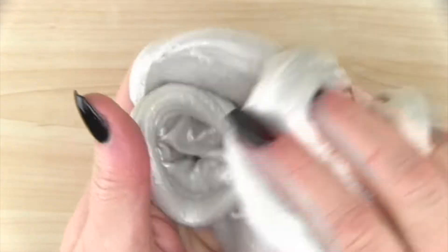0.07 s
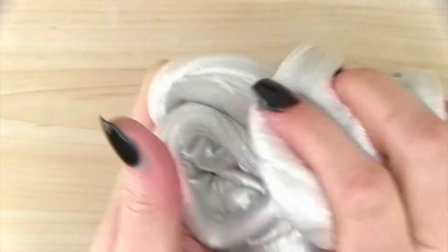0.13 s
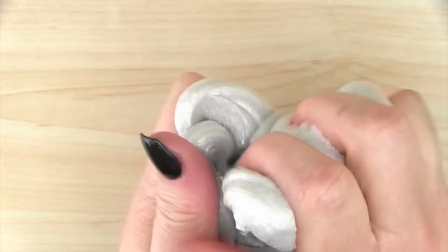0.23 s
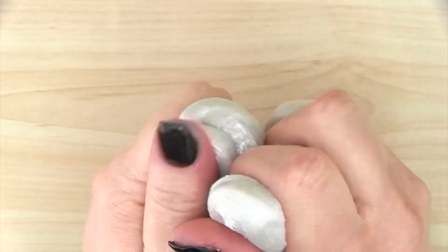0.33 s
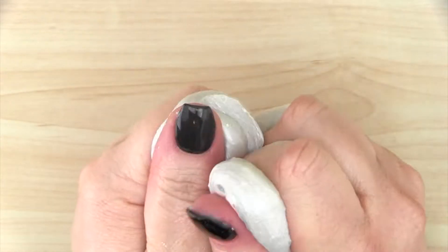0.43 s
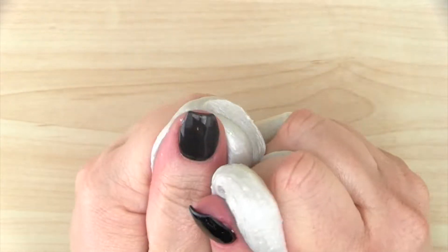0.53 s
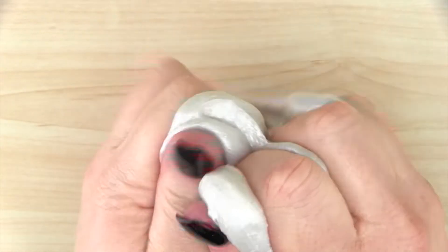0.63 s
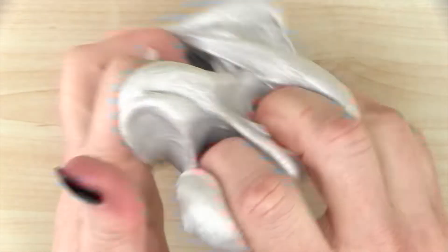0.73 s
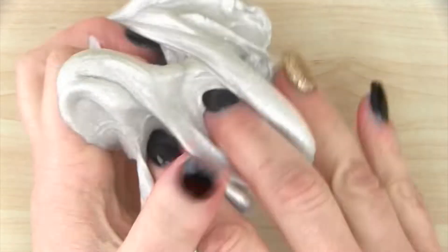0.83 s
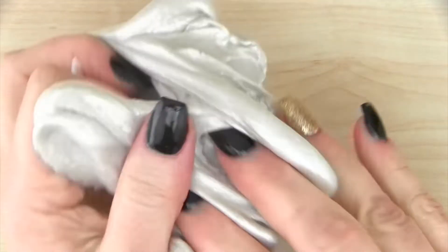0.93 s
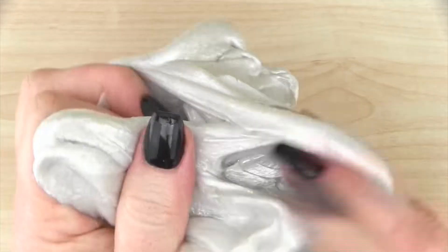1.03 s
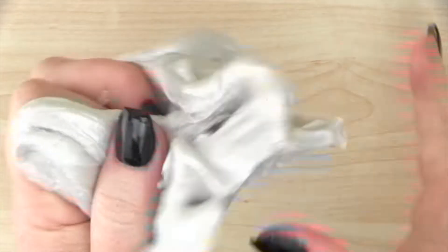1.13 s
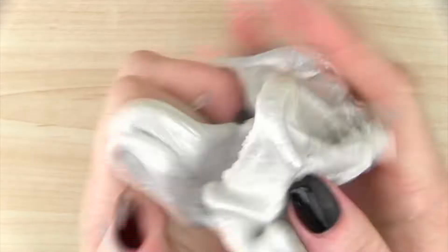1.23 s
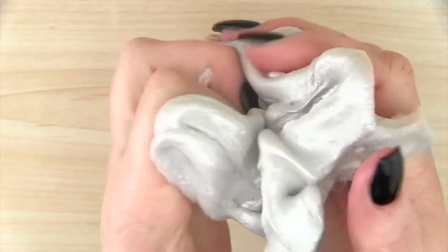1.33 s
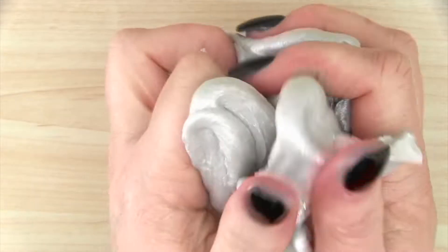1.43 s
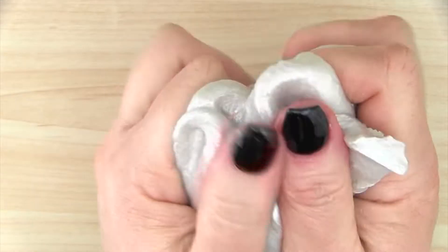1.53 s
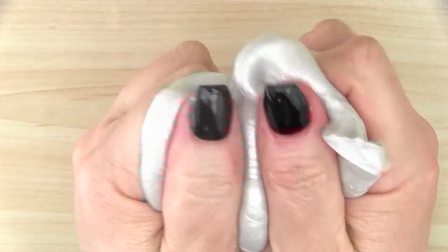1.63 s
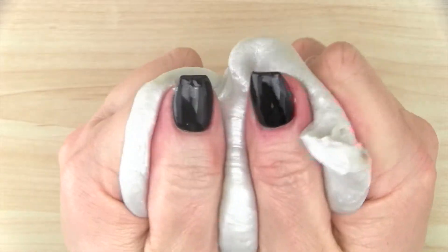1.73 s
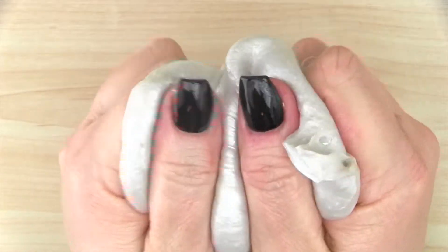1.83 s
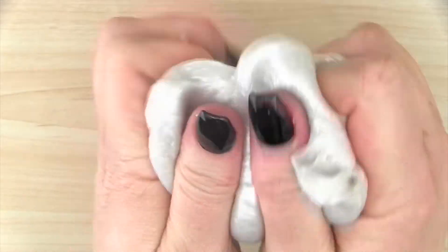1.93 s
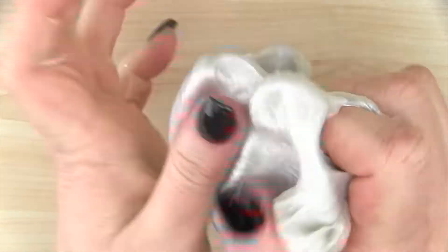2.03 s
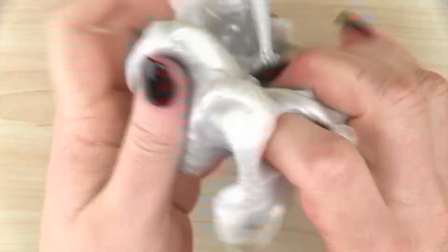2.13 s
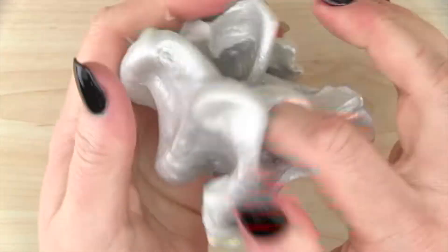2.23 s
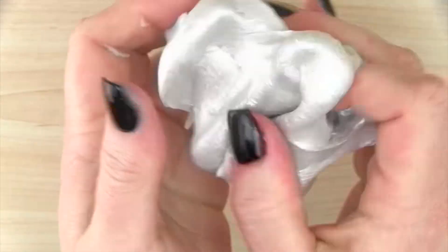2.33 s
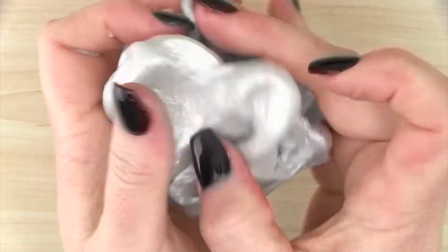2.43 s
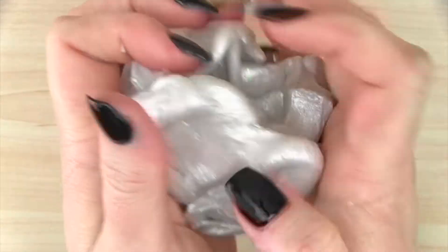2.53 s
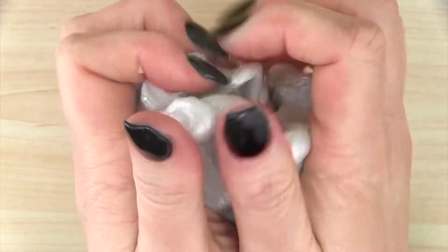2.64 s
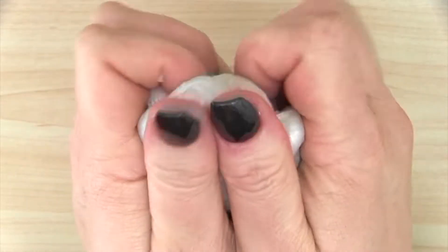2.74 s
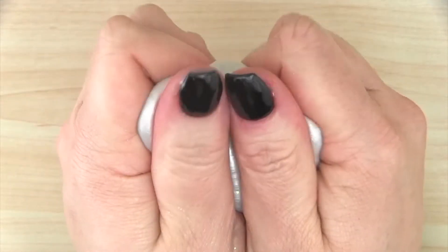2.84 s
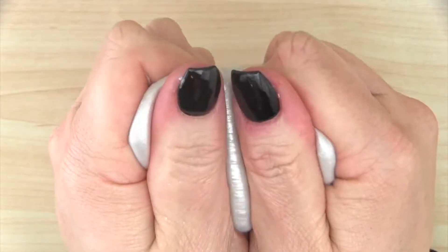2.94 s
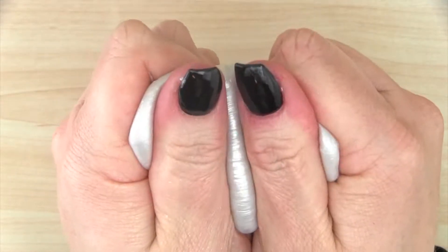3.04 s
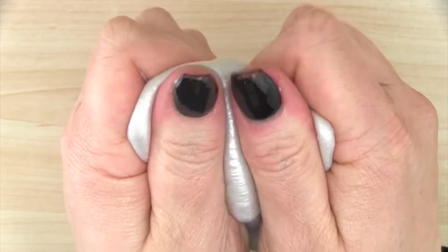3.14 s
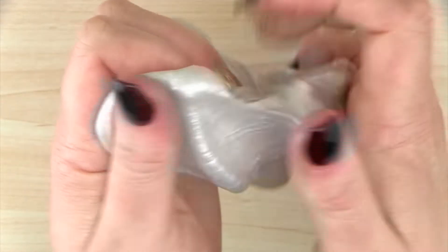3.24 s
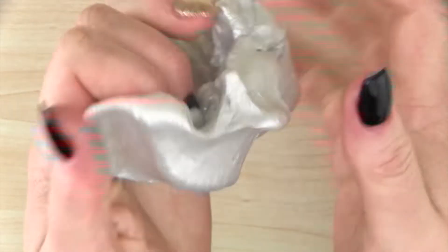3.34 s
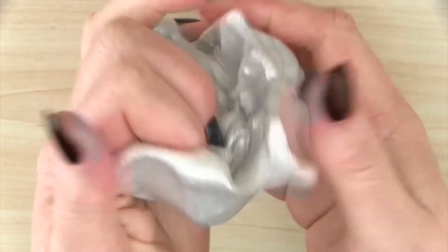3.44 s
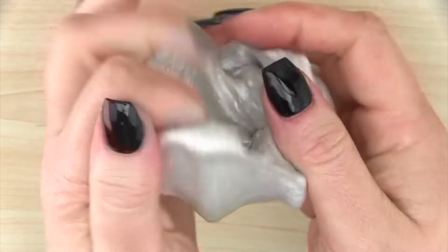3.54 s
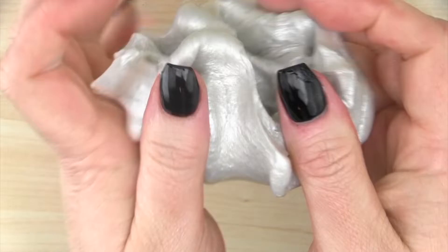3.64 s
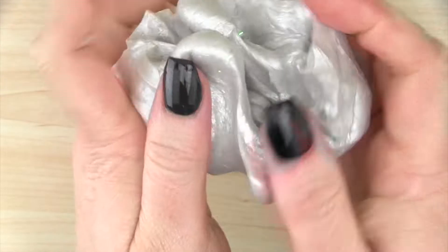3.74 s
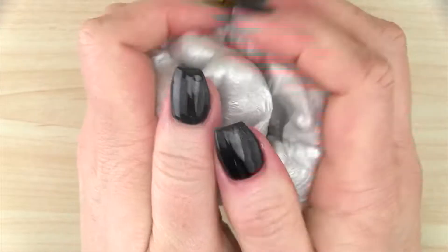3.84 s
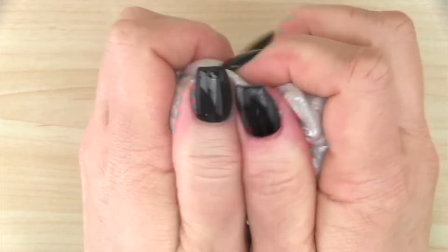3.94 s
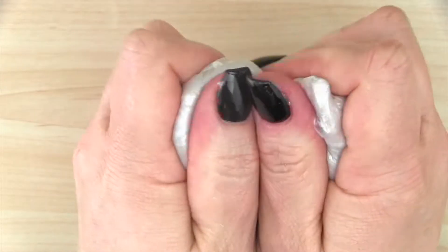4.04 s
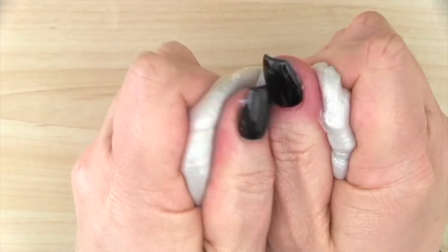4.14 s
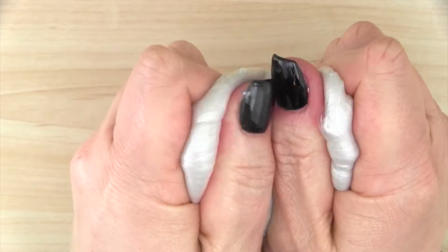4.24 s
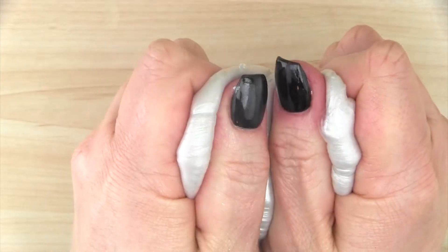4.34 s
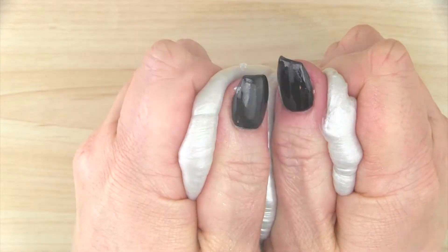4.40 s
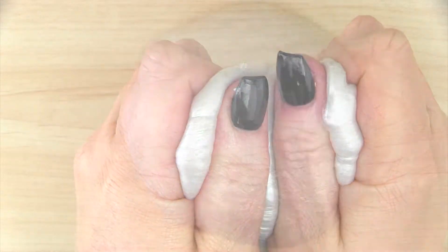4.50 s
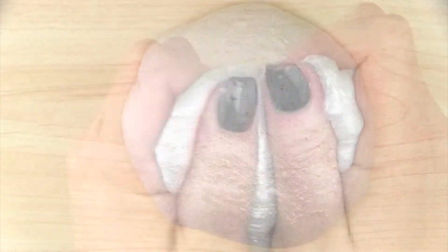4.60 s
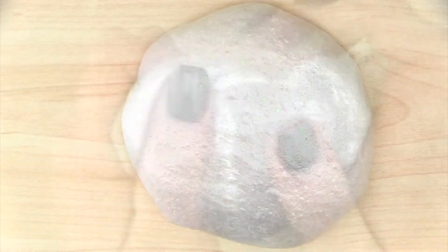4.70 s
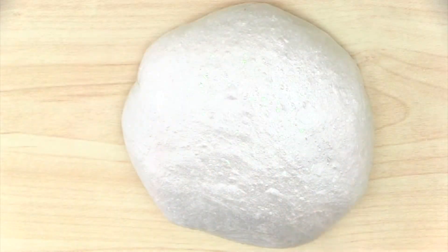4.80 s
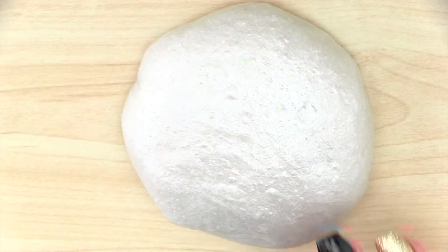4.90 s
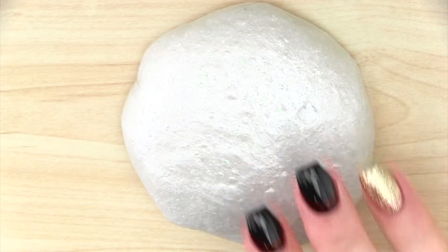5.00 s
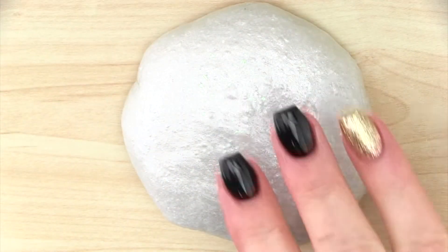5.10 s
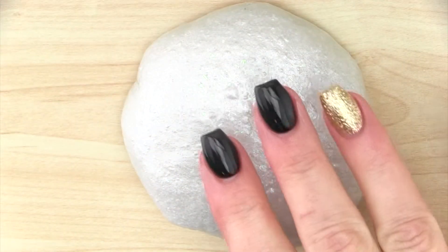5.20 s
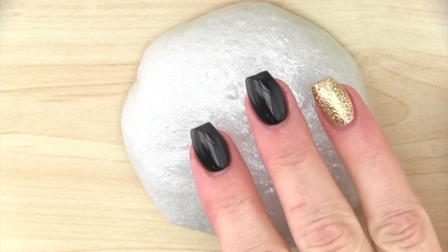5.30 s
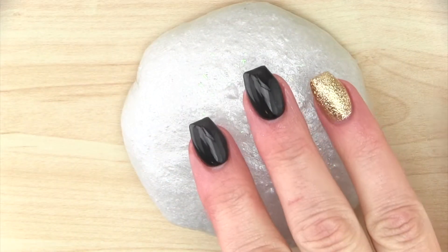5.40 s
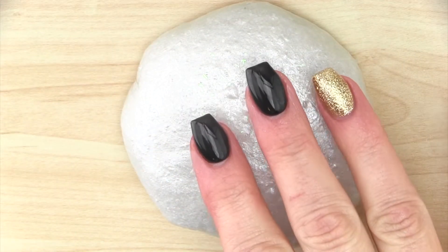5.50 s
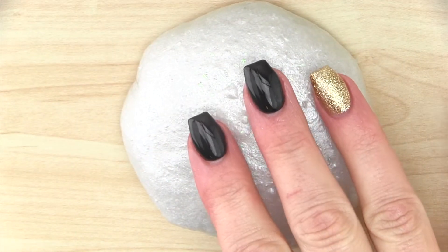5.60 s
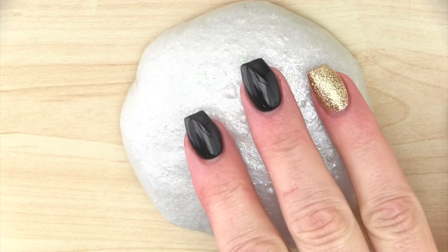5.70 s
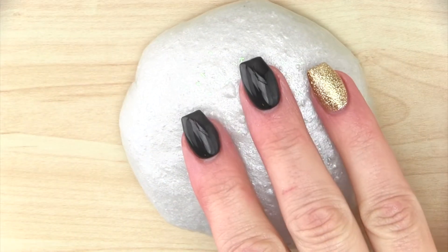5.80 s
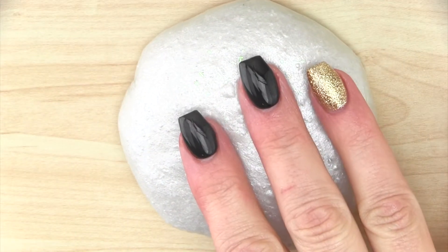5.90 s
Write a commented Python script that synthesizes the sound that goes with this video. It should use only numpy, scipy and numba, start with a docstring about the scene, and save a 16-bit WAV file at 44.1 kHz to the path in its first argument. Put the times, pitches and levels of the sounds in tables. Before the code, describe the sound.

Sticky slime is kneaded in a small room, squelching and clicking as air pockets snap, before settling into faint hiss.

```python
"""Kneading sticky slime

Two hands knead a lump of slime just above a table, close to a microphone, then let it rest.
Trapped air pockets burst with sharp pops, swarms of small bubbles squelch at every fold,
and twice air hisses out through a thin slit. A small room echoes briefly, over a faint
appliance hum, a low rumble and the hiss of the microphone."""
import sys
import numpy as np
from scipy import signal
from scipy.fft import rfft, irfft
from scipy.io import wavfile
from numba import njit

SR = 44100
rng = np.random.default_rng(int(sys.argv[2]) if len(sys.argv) > 2 else 0)


def transcribe(signal):
    """Save signal, clipped to [-1, 1], as a 16-bit WAV file at the path in sys.argv[1]."""
    frames = np.atleast_2d(signal).T
    limited = np.clip(frames, -1, 1)
    pcm = np.round(limited * 32767).astype(np.int16)
    wavfile.write(sys.argv[1], SR, pcm)


N = 262791


def pops():
    """Air pockets burst: the skin snaps, the pocket and its mouth (the opening) ring, the lump thuds."""
    # The main bursts. Columns: start_s, pocket_hz, pocket_db, mouth_hz, mouth_db, mouth_cycles,
    # snap_hz, snap_db, thud_db
    bursts = [(0.033, 1300, -55, 2800, -46.5, 9.6, 7000, -60, -75),
              (0.06, 1810, -51, 3000, -52, 8.5, 7000, -62, -75),
              (0.131, 1450, -53, 3200, -53.5, 9.5, 7000, -68, -78),
              (0.2867, 1450, -50, 4650, -57, 4.2, 8900, -41, -76),
              (0.367, 1720, -68, 4950, -54, 3.5, 10800, -27, -72),
              (0.3713, 2370, -65, 3680, -46, 10, 8600, -36, -77),
              (0.3946, 2500, -51, 5020, -35.5, 2.5, 9500, -26.5, -72),
              (0.4303, 2500, -64, 2820, -48, 4.6, 7700, -36, -79),
              (0.4694, 2660, -30.5, 3860, -18, 5.4, 12500, -10, -55),
              (0.5103, 1400, -15, 4100, -11.5, 3.3, 7000, -4.5, -14.5),
              (0.5389, 2150, -18.5, 4400, -12, 3, 7540, -5.5, -20.5),
              (0.5582, 1840, -54, 4430, -32, 2.6, 7800, -17.5, -31),
              (0.6184, 2500, -57, 4440, -54, 6.0, 10600, -24.5, -65),
              (0.8586, 1930, -41, 3830, -32, 7.5, 7000, -30, -65),
              (0.897, 1390, -32.5, 3700, -40, 4.8, 8700, -40, -68),
              (0.9323, 2150, -58, 3560, -37.5, 7.9, 7000, -43, -69),
              (0.9714, 2150, -65, 3960, -29.5, 4.3, 7750, -23.5, -64),
              (1.013, 1500, -50, 3680, -36.5, 12, 7000, -37, -68),
              (1.0235, 1360, -59, 3700, -35.5, 6.6, 7000, -33, -71),
              (1.0517, 1130, -44.5, 3730, -45, 11, 11100, -35, -62),
              (1.12, 2480, -58, 3650, -40.5, 29, 11300, -32, -70),
              (1.156, 2480, -43, 2820, -50, 6.2, 12200, -28, -72),
              (1.1704, 2500, -52, 2820, -47, 5.4, 11100, -23.5, -69),
              (1.2966, 2240, -65, 3510, -46, 4, 10600, -26, -75),
              (1.3446, 1510, -40.5, 3640, -48, 8.4, 7300, -43, -67),
              (1.3969, 1120, -46, 3700, -55, 8.3, 8700, -56, -69),
              (1.6497, 1640, -36.5, 4600, -33.5, 13, 7340, -27, -40),
              (1.703, 1960, -43, 4450, -39, 8.5, 7000, -43, -70),
              (1.7188, 1740, -73, 3920, -31, 2.6, 7840, -27, -63),
              (1.7437, 2400, -49, 3330, -33, 24, 7000, -26, -66),
              (1.7596, 910, -55, 3100, -33, 3.5, 9600, -22, -72),
              (1.824, 1120, -43.5, 3750, -56, 10, 7400, -53, -70),
              (1.8458, 1920, -69, 6500, -18.5, 7.4, 11640, 0.5, -42.5),
              (1.8946, 1840, -73, 4840, -32, 5.1, 7800, -24, -62),
              (2.245, 2500, -44, 3490, -50, 7.8, 10500, -33, -65),
              (2.4213, 2500, -52, 5700, -45, 15, 7000, -48, -71),
              (2.467, 1294, -34, 3320, -39, 11, 7000, -42, -60),
              (2.748, 1380, -52, 3160, -39, 3.5, 8100, -28.5, -65),
              (2.7728, 1760, -27.5, 4930, -39, 3.8, 7000, -37, -37.5),
              (2.7944, 1500, -24.5, 3360, -32, 3, 10900, -26, -45),
              (2.8206, 1700, -48, 3630, -25.5, 7.9, 7000, -27, -58),
              (2.8274, 1940, -24, 3613, -6.5, 14, 6670, -9.5, -25),
              (2.916, 1060, -44, 4030, -33, 7.1, 8300, -25, -62),
              (2.924, 1740, -34.5, 3140, -34, 5.4, 7000, -27, -40),
              (2.9313, 1140, -54, 4970, -42, 3.5, 11100, -2, -51),
              (2.9451, 1740, -22.5, 4670, -23, 7.9, 7000, -28, -22),
              (2.9502, 1170, -27, 5080, -31, 6.8, 9300, -14.5, -54),
              (2.964, 1710, -35, 4720, -20, 3.1, 7360, -23, -58),
              (2.9696, 1270, -39, 5250, -33, 3.9, 9140, -0.5, -66),
              (3.0323, 1660, -57, 4300, -28, 2.2, 10000, -12.5, -62),
              (3.048, 2320, -43.5, 3820, -41.5, 8.8, 7000, -49, -67),
              (3.268, 1100, -38, 4890, -38.5, 13, 9300, -37, -55),
              (3.3938, 2510, -61, 2820, -43.5, 18, 7000, -52, -65),
              (3.4534, 1730, -58, 3480, -45.5, 12.5, 7000, -53, -70),
              (3.5961, 1554, -39, 3260, -41, 7.3, 9600, -49, -64),
              (3.618, 1730, -35, 3230, -42, 3.5, 8300, -41, -70),
              (3.7207, 2520, -46, 2800, -42, 5.5, 7150, -33.5, -68),
              (3.7531, 1740, -48, 2760, -53, 12, 12500, -33, -71),
              (3.8502, 1410, -49, 4430, -44, 9.5, 7000, -46.5, -68),
              (3.9001, 1560, -55, 4200, -36, 2.8, 9300, -30.5, -53),
              (3.9566, 2480, -36, 5070, -29, 2.8, 8700, -22.5, -70),
              (3.9826, 850, -36, 3200, -36.5, 4.8, 6440, -25, -41),
              (4.0619, 2300, -38, 4300, -30.5, 3.3, 7000, -49, -72),
              (4.088, 1380, -38.5, 2970, -37, 3.7, 10600, -27, -39.5),
              (4.1025, 2500, -56, 5750, -32, 4, 7000, -25.5, -68),
              (4.1198, 2640, -33, 3800, -34, 6.2, 7000, -25, -37),
              (4.1271, 1490, -32.5, 3830, -29.5, 7.9, 9100, -23, -68),
              (4.137, 1700, -23.5, 4780, -43, 3.8, 7000, -33, -39),
              (4.1439, 1850, -50, 4050, -52, 3.5, 9450, -14, -67),
              (4.186, 1960, -59, 4500, -45, 3.5, 13400, -28, -69),
              (4.2228, 1600, -3.5, 2660, -1.5, 3.86, 9400, -2, -39),
              (4.2742, 1210, -46, 5300, -30, 6.4, 6900, -20.5, -50.5),
              (4.527, 2410, -71, 3480, -55, 3, 7110, -40, -79)]
    thud_hz, thud_cycles, snap_cycles = 416, 1.4, 3
    overtone_ratios = np.array([1.2, 1.4])  # extra tones of the uneven mouth
    is_skin = np.arange(6) == 4  # six parts: pocket, mouth, two overtones, skin snap, thud
    thin_skin = signal.butter(2, 1500, "high", fs=SR, output="sos")  # thin skin makes no low sound
    out = np.zeros(N + SR)
    for row in [*bursts, *small_pockets()]:
        start_s, pocket_hz, pocket_db, mouth_hz, mouth_db, mouth_cycles, snap_hz, snap_db, thud_db = row
        rings_hz = np.array([pocket_hz, mouth_hz, *(mouth_hz * overtone_ratios)])
        ring_s = mouth_cycles / mouth_hz * np.array([1.5, 1, 1, 1])  # the pocket rings longer
        pitch_hz = np.append(rings_hz, [snap_hz, thud_hz])
        cycles = np.clip(np.append(ring_s * rings_hz, [snap_cycles, thud_cycles]), 1.5, 30)
        overtone_db = mouth_db - 7.5
        size = undb([pocket_db, mouth_db, overtone_db, overtone_db, snap_db, thud_db])
        body, snap = (bubbles(1024, np.zeros(6, np.int64), pitch_hz, cycles, size * part,
                              glide=.05, rise_cycles=.33) for part in (~is_skin, is_skin))
        burst = body + signal.sosfilt(thin_skin, snap)
        heard = np.convolve(burst, nearby_echoes())  # the hands move, so each burst echoes differently
        at = int(start_s * SR)
        out[at:at + len(heard)] += heard
    return out[:N]


def small_pockets():
    """Extra burst rows for pops(): small pockets give way at random, louder when the squelch is louder."""
    pockets_per_s, scatter_db = 18, 5
    when, pocket, mouth, snap, ring, big = rng.random((int(pockets_per_s * N / SR), 6)).T
    start_s = when * N / SR
    _, levels_db = swells(start_s)
    small_db, large_db, film_db, smack_db = levels_db - scatter_db * np.log(1 - .9 * big)
    return np.transpose([start_s, 1100 + 1400 * pocket, large_db + 6,
                         2800 + 2200 * mouth, small_db + 8, 3.1 + 7 * ring,
                         7000 + 5000 * snap, film_db + 17, smack_db - 6])


def squelch():
    """Swarms of bubbles of every size let go at random while the slime is folded."""
    # One swarm each for small bubbles, large bubbles, tearing film and the smack of the lump.
    # Columns: spread_octaves, ring_cycles, bubbles_per_s, scatter_db
    swarms = [(.19, 12., 1600, 2.7), (.3, 8., 900, 3.), (.6, 3., 14000, 1.5), (.6, 3., 1000, 1.5)]
    film_hz, smack_hz = 8500, 493
    time_s = np.arange(0, N / SR, .002)
    (small_hz, large_hz), levels_db = swells(time_s)
    centres_hz = small_hz, large_hz, np.full_like(time_s, film_hz), np.full_like(time_s, smack_hz)
    out = 0
    for (octaves, cycles, per_s, scatter_db), centre_hz, level_db in zip(swarms, centres_hz, levels_db):
        when, up, down, big = rng.random((int(per_s * N / SR), 4)).T
        pitch_hz = np.interp(when * N / SR, time_s, centre_hz) * 2 ** (2 * octaves * (up - down))
        pitch_hz = np.clip(pitch_hz, 60, .4 * SR)
        size = undb(-scatter_db * np.log(1 - .99 * big))  # many quiet, a few loud
        swarm = bubbles(N, (when * N).astype(np.int64), pitch_hz, np.full(len(when), cycles), size,
                        glide=.18, rise_cycles=.082)
        out = out + set_level(swarm, 0) * undb(np.interp(np.arange(N) / SR, time_s, level_db))
    return out * slips()


def swells(time_s):
    """The squelch swells and fades. Gives two bubble pitches (small, large) and four swarm levels."""
    # Swells of squelch: folds of the lump, and (at 4.242 s) the wash dying away after the big pop.
    # Columns: peak_s, rise_s, fall_s, small_hz, large_hz, small_db, large_db, film_db, smack_db
    swell_rows = [(0.0, .05, 0.13, 2850, 1660, -65.5, -68, -71, -71),
                  (0.17, .05, .06, 3350, 1660, -66.5, -66, -67, -84),
                  (0.41, .25, 0.26, 3660, 1900, -73, -69.5, -71, -95),
                  (0.527, 0.037, .14, 4000, 1540, -52, -56, -52.5, -47.5),
                  (0.755, 0.093, 0.16, 3390, 1500, -46, -53, -49, -54.5),
                  (0.87, 0.11, 0.17, 3680, 1400, -58, -59.5, -60, -69),
                  (1.022, 0.13, 0.21, 3570, 1500, -64.5, -62.5, -62.5, -74),
                  (1.127, 0.033, 0.11, 3560, 1390, -54.5, -59, -55, -85),
                  (1.168, 0.078, 0.034, 2860, 2130, -54.5, -55, -58, -76),
                  (1.326, 0.11, 0.11, 3360, 1500, -58, -62.5, -61, -86),
                  (1.463, 0.2, 0.2, 2670, 1820, -70, -67.5, -72, -85),
                  (1.653, .02, .03, 3400, 1680, -50, -46, -58, -64),
                  (1.762, 0.096, 0.058, 3640, 1800, -50, -59, -49.5, -75),
                  (1.866, 0.14, 0.13, 3800, 1770, -62.5, -69, -57.5, -90),
                  (2.003, 0.048, .08, 3100, 1480, -46, -53, -50.5, -54),
                  (2.038, 0.076, .09, 3430, 1760, -43, -46.5, -48.5, -49),
                  (2.125, 0.17, 0.066, 3330, 1650, -53.5, -57.5, -54.5, -61),
                  (2.267, 0.32, 0.13, 3400, 1470, -60, -59, -57.5, -67),
                  (2.488, .09, .07, 3410, 1410, -46, -49.5, -54.5, -58),
                  (2.58, 0.14, .15, 3500, 1670, -68, -66.5, -67, -73),
                  (2.75, .06, 0.064, 3380, 1680, -70, -66.5, -64.5, -81),
                  (2.85, 0.097, .09, 4100, 1840, -49.5, -56, -61, -58),
                  (3.04, 0.44, 0.12, 3750, 1790, -69.5, -66.5, -58, -73),
                  (3.286, 0.076, 0.15, 3300, 1620, -50, -50.5, -49, -52),
                  (3.333, 0.09, 0.13, 3540, 1750, -48.5, -51, -54, -55),
                  (3.546, 0.048, 0.044, 3100, 1900, -52, -62, -68, -80),
                  (3.62, 0.066, 0.22, 3340, 1410, -59, -62, -58.5, -65.5),
                  (3.724, 0.4, 0.12, 3100, 1500, -66, -63.5, -59.5, -93),
                  (3.851, 0.027, 0.022, 3960, 1830, -52.5, -63, -55.5, -96),
                  (3.903, 0.086, 0.08, 4100, 1620, -72, -78, -66.5, -88),
                  (3.987, 0.019, 0.036, 3360, 960, -75, -76, -60, -62),
                  (4.153, 0.27, .1, 3690, 1610, -60.5, -72.5, -64.5, -68),
                  (4.204, 0.082, .03, 2960, 1500, -73, -73, -52, -70.5),
                  (4.242, .04, 0.12, 3200, 1500, -44, -47, -55.5, -49),
                  (4.73, .04, 0.13, 3813, 1480, -68, -73, -66, -73.5)]
    columns = np.transpose(swell_rows)
    peak_s, rise_s, fall_s = columns[:3]
    pitch_hz, power = columns[3:5], undb(columns[5:]) ** 2
    foot_db = -27.5  # a swell's level rise_s before its peak and fall_s after it
    after_s = time_s[:, None] - peak_s
    from_peak = np.where(after_s < 0, -after_s / rise_s, after_s / fall_s)
    swell = undb(np.maximum(foot_db * from_peak ** 1.1, -150)) ** 2  # 1.1 rounds the crest
    total_power = power @ swell.T
    average_hz = (pitch_hz * power[:2]) @ swell.T / total_power[:2]  # louder swells count more
    return average_hz, 10 * np.log10(total_power)


def slips():
    """Sticky slime gives way in jerks; each jerk makes the squelch louder for a moment."""
    slips_per_s, slip_s, scatter_db, steady_share = 110, .005, 2.3, .6
    when, size = rng.random((int(slips_per_s * N / SR), 2)).T
    jerks = np.zeros(N)
    jerks[(when * N).astype(int)] = undb(-scatter_db * np.log(1 - .98 * size))
    jerks = signal.lfilter([1], [1, -np.exp(-1 / (slip_s * SR))], jerks)
    return set_level(steady_share + (1 - steady_share) * set_level(jerks, 0), 0)


def leaks():
    """Air escapes through a slit that rings at a rising pitch; tiny puffs blur into a thin hiss."""
    # Leaking slits. Columns: start_s, end_s, start_hz, end_hz, level_db
    slits = [(2.158, 2.33, 5900, 6050, -68.5), (2.406, 2.563, 5730, 6500, -63)]
    out = np.zeros(N)
    for start_s, end_s, start_hz, end_hz, level_db in slits:
        when, spread = rng.random((150, 2)).T
        pitch_hz = (start_hz + (end_hz - start_hz) * when) * (1 + .14 * (spread - .5))
        at = ((start_s + (end_s - start_s) * when) * SR).astype(np.int64)
        size = np.sin(np.pi * when) ** .5
        puffs = bubbles(N, at, pitch_hz, np.full(len(when), 14.), size, glide=0., rise_cycles=1.8)
        out += puffs * undb(level_db) / np.sqrt(np.sum(puffs ** 2) / ((end_s - start_s) * SR))
    return out


@njit
def bubbles(samples, start, pitch_hz, cycles, size, glide, rise_cycles):
    """Short tones that fade about 30 dB in `cycles` vibrations; glide lifts the pitch as bubbles shrink."""
    out = np.zeros(samples)
    for k in range(len(start)):
        step = 2 * np.pi * pitch_hz[k] / SR
        decay = np.exp(-np.log(30.) * pitch_hz[k] / (cycles[k] * SR))
        opening = np.exp(-pitch_hz[k] / (rise_cycles * SR))
        span = int(2 * cycles[k] * SR / pitch_hz[k])
        phase, gain, shut = 0., size[k], 1.
        for i in range(start[k], min(start[k] + span, samples)):
            out[i] += gain * (1 - shut) * np.sin(phase)
            phase += step
            step = min(step * (1 + glide / span), 3.)
            gain *= decay
            shut *= opening
    return out


def nearby_echoes():
    """The direct sound, then its bounces off fingers, lump and table; soft surfaces swallow the treble."""
    soft = signal.butter(1, 6500, fs=SR, output="sos")
    echoes = undb(-2.5) * signal.sosfilt(soft, dying_noise(.03, fade_s=.031))
    echoes[:16] = 0  # a tiny gap before the first bounce
    echoes[0] = 1  # the direct sound
    return echoes


def room(sound):
    """The walls of a small room send back a short blur of echoes that loses its treble first."""
    echo_db, split_hz, first_wall_s = -15, 4400, .0043
    low = signal.sosfilt(signal.butter(2, split_hz, fs=SR, output="sos"), dying_noise(.4, fade_s=.2))
    treble_only = signal.butter(2, split_hz, "high", fs=SR, output="sos")
    high = signal.sosfilt(treble_only, dying_noise(.4, fade_s=.036))
    tail = np.concatenate([np.zeros(int(first_wall_s * SR)), low + high])
    return undb(echo_db) * signal.fftconvolve(sound, tail)[:N]


def hum():
    """A distant appliance hums with a few low tones, each wavering on its own."""
    # The tones of the hum. Columns: pitch_hz, level_db
    tones = [(59.2, -76.5), (118.4, -76.5), (193.8, -81.5), (242.2, -78.5), (360.7, -84.5), (597.5, -96),
             (839.8, -90.5)]
    time_s, out = np.arange(N) / SR, 0
    slow = signal.butter(1, 11, fs=SR, output="sos")
    for pitch_hz, level_db in tones:
        waver = .65 + .71 * set_level(signal.sosfilt(slow, rng.standard_normal(N)), 0)
        tone = np.sin(2 * np.pi * (pitch_hz * time_s + rng.random()))
        out = out + set_level(waver * tone, level_db)
    return out


def rumble_and_hiss():
    """The room rumbles and the microphone hisses, a little differently left and right."""
    # How strong the noise is from bass to treble. Columns: pitch_hz, relative_db
    noise_curve = [(15, -12), (40, -7), (100, -1), (200, 0), (290, -6), (420, -7), (1300, -11.5),
                   (10000, -16), (16000, -17)]
    # The left-right difference, compared with the noise both sides share. Columns: pitch_hz, relative_db
    side_curve = [(25, -5), (60, -9), (110, -11), (200, -15), (380, -8), (700, -5), (1290, -4), (2380, -3),
                  (4400, -3), (8120, -2), (15000, -3)]
    shared, side = (colour(rng.standard_normal(N), noise_curve) for _ in range(2))
    gain = undb(-71) / np.sqrt(np.mean(shared ** 2))
    return gain * (shared + colour(side, side_curve) * np.array([[1], [-1]]))


def undb(db):
    """Turns decibels into a number to multiply by."""
    return 10 ** (np.asarray(db) / 20)


def set_level(sound, db):
    """Scales a sound to an average (rms) level."""
    return sound * undb(db) / np.sqrt(np.mean(sound ** 2))


def dying_noise(length_s, fade_s):
    """Noise with a total energy of 1 that drops 60 dB in fade_s."""
    n = np.arange(int(length_s * SR))
    tail = rng.standard_normal(len(n)) * np.exp(-np.log(1000) * n / (fade_s * SR))
    return tail / np.sqrt(np.sum(tail ** 2))


def colour(sound, curve):
    """Turns each pitch up or down along a curve of (pitch_hz, gain_db) points."""
    pitch_hz, gain_db = np.transpose(curve)
    all_hz = np.maximum(np.arange(N // 2 + 1) * SR / N, 1)
    return irfft(rfft(sound) * undb(np.interp(np.log(all_hz), np.log(pitch_hz), gain_db)), N)


def scene():
    """The slime and its room echo; the background hum and hiss fade down briefly and come back."""
    small_lump = signal.butter(2, 230, "high", fs=SR, output="sos")  # too small to make much bass
    slime = signal.sosfilt(small_lump, pops() + squelch() + leaks())
    dip_db, dip_s, dip_width_s = -3, 4.62, .077
    dip = undb(dip_db * np.exp(-((np.arange(N) / SR - dip_s) / dip_width_s) ** 2))
    return slime + room(slime) + dip * (hum() + rumble_and_hiss())


def record(dry):
    """The recorder cuts off the highest treble."""
    return signal.sosfilt(signal.ellip(8, .2, 50, 15750, fs=SR, output="sos"), dry)


dry = scene()
out = record(dry)
transcribe(out)
```